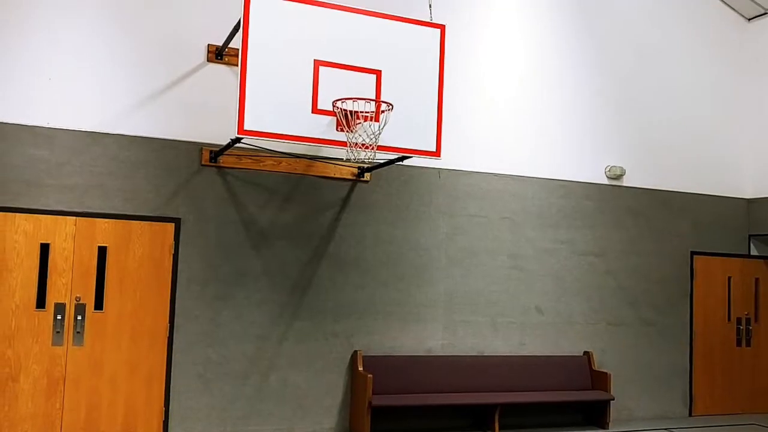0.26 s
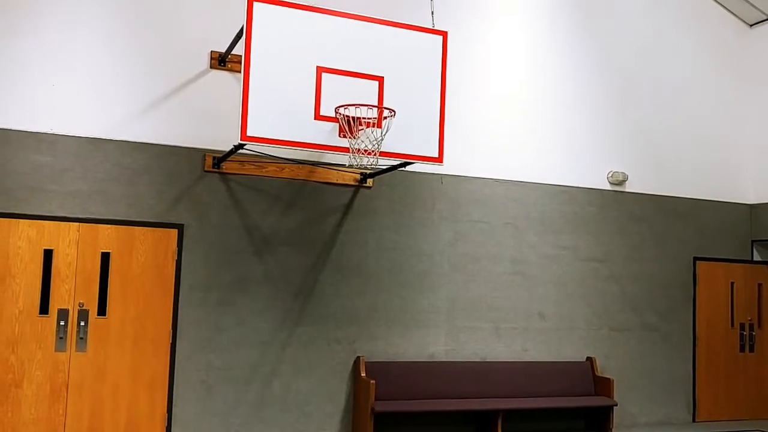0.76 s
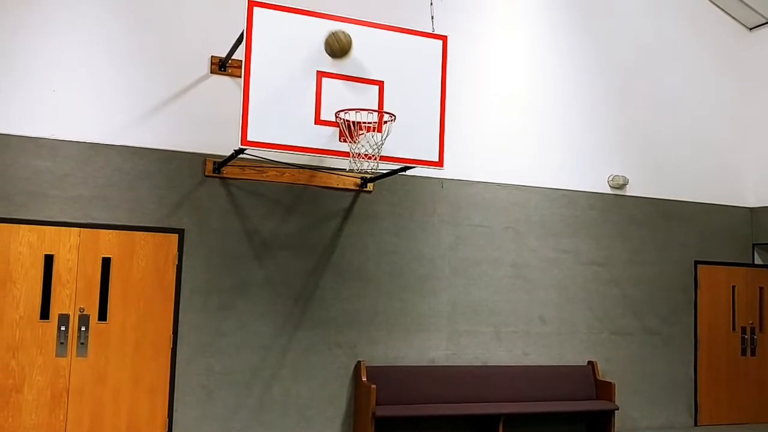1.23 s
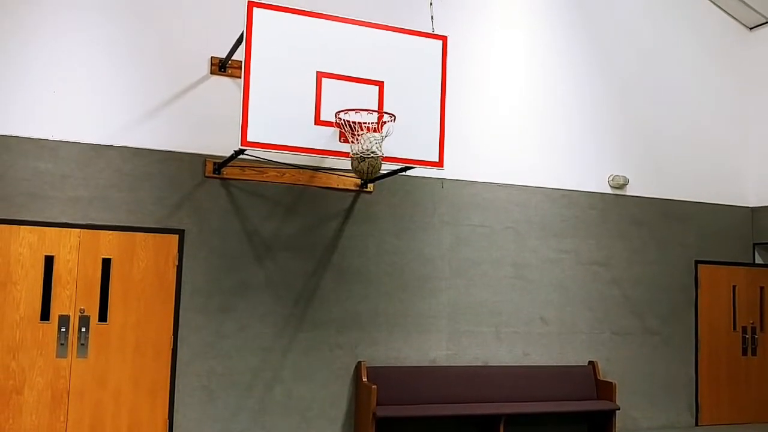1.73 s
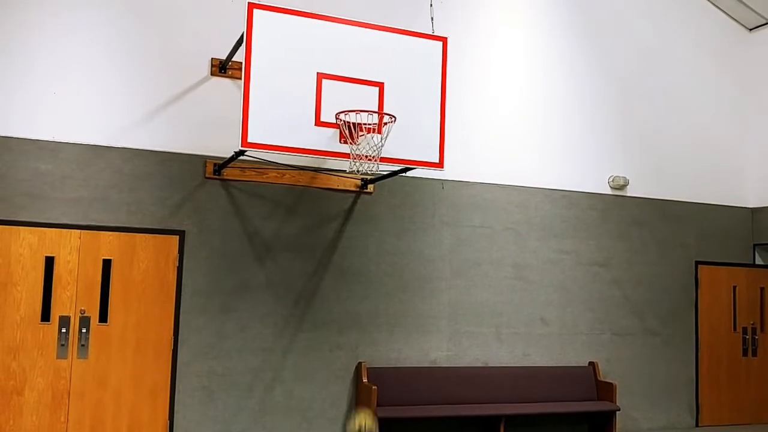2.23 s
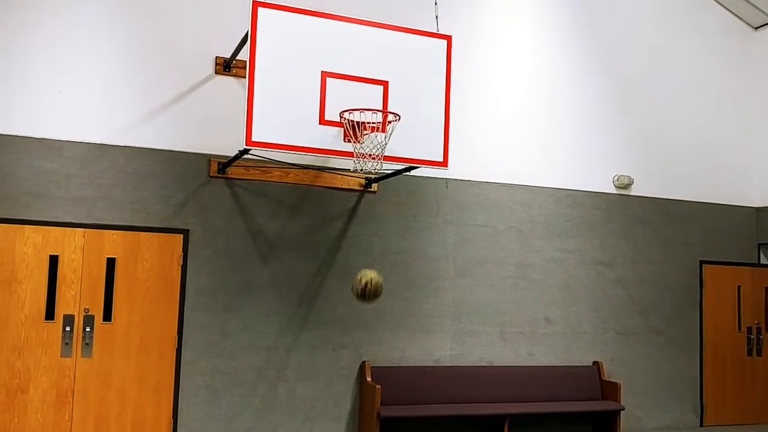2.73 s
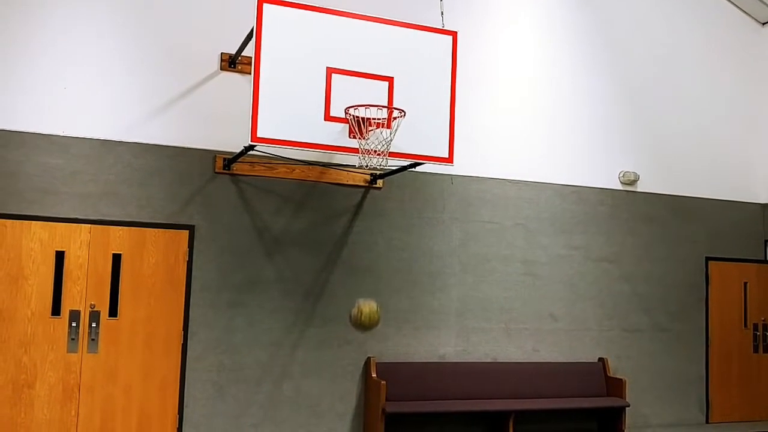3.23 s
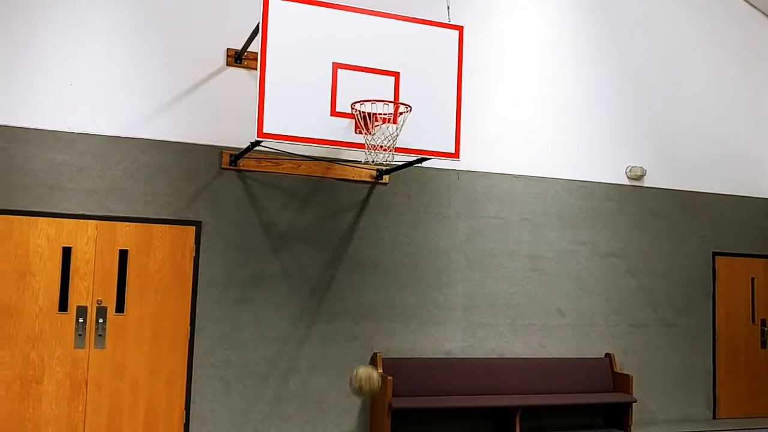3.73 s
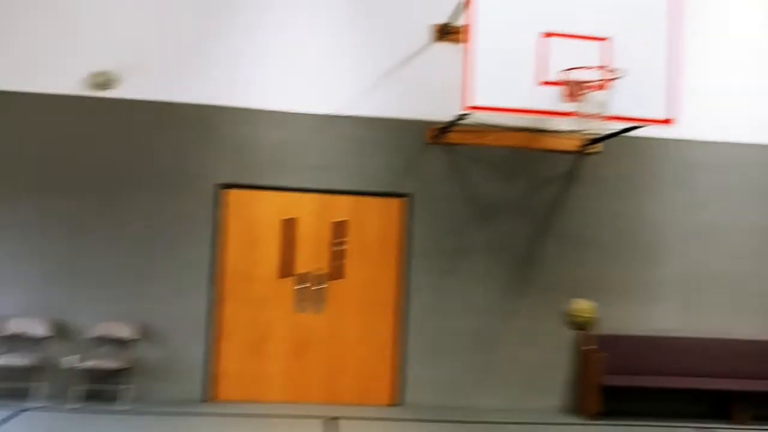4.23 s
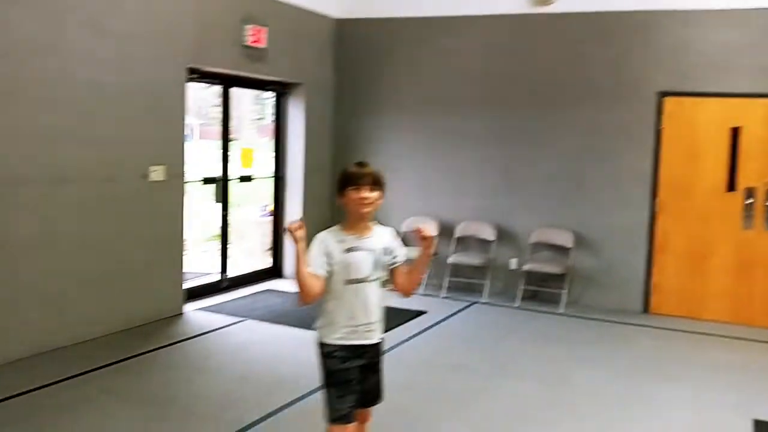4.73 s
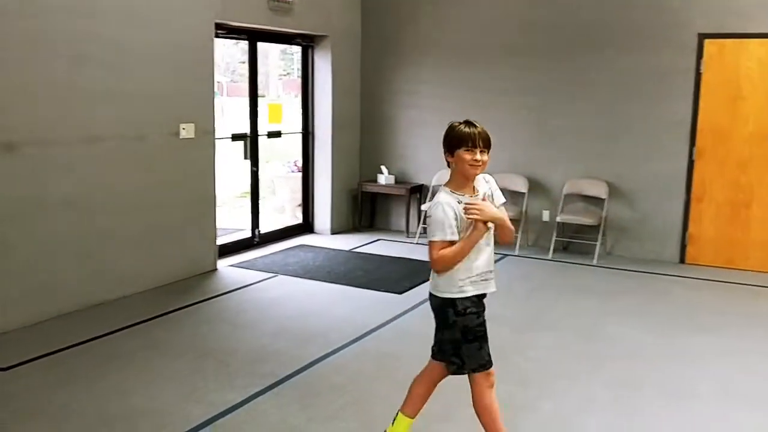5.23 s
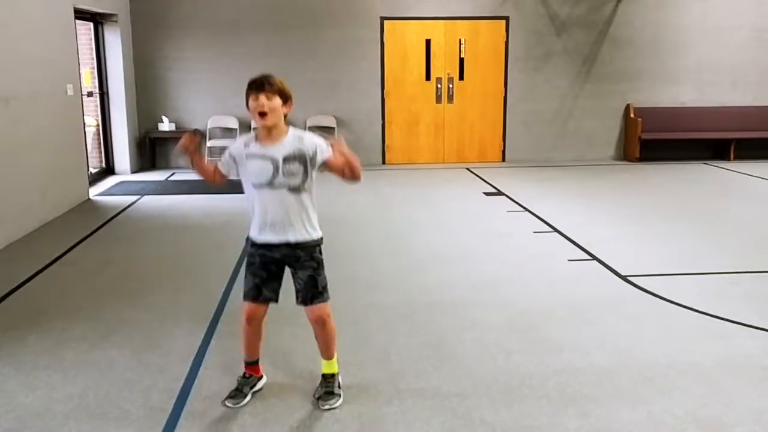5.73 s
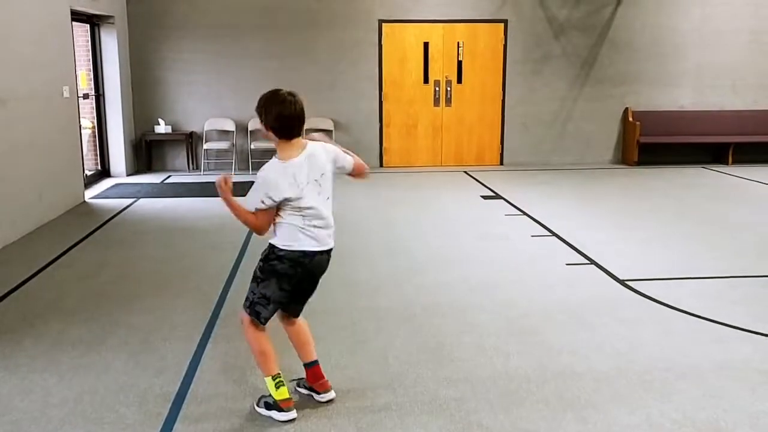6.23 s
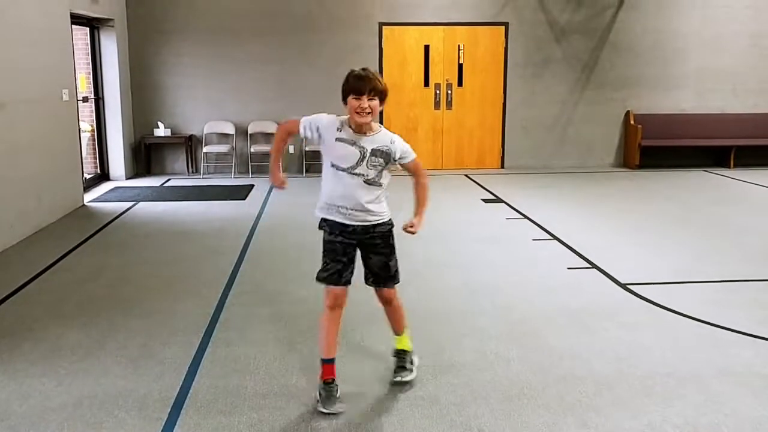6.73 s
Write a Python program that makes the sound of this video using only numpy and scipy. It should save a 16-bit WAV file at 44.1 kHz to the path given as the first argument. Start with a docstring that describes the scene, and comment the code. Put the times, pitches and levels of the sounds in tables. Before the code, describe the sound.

A basketball rattles the hoop, swishes through the net and bounces four times in an echoing gym; two claps, then shuffling feet.

```python
"""In the still air of an echoing gym an earlier echo dies away, and clothes brush faintly now and then.
A basketball rattles on the hoop: knocks, ringing steel and a booming board. The net quivers, then
swishes as its cords snag on the ball. The ball bounces four times: rubber smack, ringing air, thump.
Two thin ticks fall among the bounces. Hands near the microphone clap twice with bursts of noise.
The level dips briefly; feet shuffle with a growing rumble and hiss, and a sole scuffs with a rasp."""
import sys
import numpy as np
from scipy import signal
from scipy.fft import rfft, irfft, next_fast_len
from scipy.io import wavfile
from scipy.ndimage import uniform_filter1d

SR = 44100
rng = np.random.default_rng(int(sys.argv[2]) if len(sys.argv) > 2 else 0)


def to_wav(s):
    """Save 16-bit WAV."""
    ch = np.atleast_2d(s).T  # columns
    pcm = np.round(np.clip(ch, -1, 1) * 32767)  # PCM
    wavfile.write(sys.argv[1], SR, pcm.astype(np.int16))


N = 307375  # length of the scene in samples


def gain_of(db):
    """Turns decibels into a factor for the sound pressure."""
    return 10 ** (np.asarray(db) / 20)


def evened(x):
    """Scales a sound to an average strength (rms) of 1."""
    return x / np.sqrt(np.mean(x ** 2) + 1e-20)


def read(points, hz):
    """Reads a table between its points, with pitch spaced as the ear hears it (log frequency)."""
    table_hz, value = np.transpose(points)
    return np.interp(np.log(hz + 1), np.log(table_hz + 1), value)


def add(mix, start_s, sound):
    """Mixes a sound in at a time, cutting off what does not fit."""
    part = mix[..., max(round(start_s * SR), 0):][..., :sound.shape[-1]]
    part += sound[..., :part.shape[-1]]


def colour(x, spectrum):
    """Filters a steady sound by a table of levels over pitch, then evens it to rms 1."""
    n = x.shape[-1]
    size = next_fast_len(n)
    gain = gain_of(read(spectrum, np.fft.rfftfreq(size, 1 / SR)))
    return evened(irfft(rfft(x, size) * gain, size)[..., :n])


def click(spectrum, tilt_db=0, size=4096):
    """A sudden click of energy 1 with this spectrum, tilted about 1 kHz by some dB per octave."""
    hz = abs(np.fft.fftfreq(size, 1 / SR))
    octaves = np.log2(np.maximum(hz, 250) / 1000)  # the tilt stays level below 250 Hz
    log_gain = np.log(gain_of(read(spectrum, hz) + tilt_db * octaves))
    # minimum phase: the energy comes as early as it can, and nothing before the start
    pulse = np.fft.ifft(np.exp(np.conj(signal.hilbert(log_gain)))).real[:size // 2]
    return pulse / np.linalg.norm(pulse)


def ring(modes):
    """A struck body sounds as a sum of sine tones, each falling by 60 dB in its own time t60."""
    t = np.arange(SR) / SR
    return sum(gain_of(db - 60 * t / t60) * np.sin(2 * np.pi * hz * t) for hz, db, t60 in modes)


def resonate(x, hz, width_hz):
    """A resonance of gain 1 that can follow a moving pitch."""
    turn = np.exp(2j * np.pi * np.cumsum(hz * np.ones(len(x))) / SR)
    r = np.exp(-np.pi * width_hz / SR)
    # shift the pitch down to zero, smooth there, and shift back up
    return 2 * (turn * signal.lfilter([1 - r], [1, -r], x / turn)).real


def burst(t60, rise_s=0.0011):
    """A short puff of noise of energy 1 that rises quickly and dies away."""
    t = np.arange(SR // 20) / SR
    puff = rng.standard_normal(len(t)) * gain_of(-60 * t / t60) * (1 - np.exp(-t / rise_s))
    return puff / np.linalg.norm(puff)


def held(start_s, attack_s, length_s, release_s):
    """A gain that rises to 1, holds, and falls after length_s."""
    t = np.arange(N) / SR - start_s
    return np.clip(t / attack_s, 0, 1) * np.clip(1 - (t - length_s) / release_s, 0, 1)


def bell(peak_s, half_width_s):
    """A smooth swell to 1 and back, shaped like a bell curve."""
    return np.exp(-.5 * ((np.arange(N) / SR - peak_s) / half_width_s) ** 2)


# how alike the two ears hear sound from all sides: pitch_hz, likeness (1 = the same)
EAR_LIKENESS = [(100, 0.96), (200, 0.93), (350, .82), (700, 0.08), (1300, 0.0077), (8000, 0.01)]


def diffuse(n):
    """Noise arriving from all sides: the two ears agree only in the bass."""
    size = next_fast_len(n)
    a, b = rfft(rng.standard_normal((2, size)))
    same = np.clip(read(EAR_LIKENESS, np.fft.rfftfreq(size, 1 / SR)), -1, 1)
    right = same * a + np.sqrt(1 - same ** 2) * b
    return irfft(np.array([a, right]), size)[:, :n]


# slaps off the nearest walls: delay_s, gain (before echo_db), left_ear_late_ms
WALL_ECHOES = [(.0105, .48, 0.15), (0.0172, 0.4, .3), (0.0234, 0.11, -.3), (0.0361, 0.26, .2),
               (.052, .2, -.4), (.069, 0.3, .3)]


def near(sound, late_ms=0, pan_db=0, echo_db=0):
    """The direct sound and its slaps off the nearest walls; pan_db is left over right."""
    paths = np.zeros((2, SR // 10))
    add(paths[0], late_ms / 1000, gain_of([pan_db / 2]))
    add(paths[1], 0, gain_of([-pan_db / 2]))
    for delay_s, gain, wall_ms in WALL_ECHOES:
        add(paths[0], delay_s + wall_ms / 1000, gain * gain_of([echo_db]))
        add(paths[1], delay_s, gain * gain_of([echo_db]))
    return signal.fftconvolve(sound[None], paths, axes=1)[:, :N]


# how long the diffuse echo takes to fall by 60 dB: pitch_hz, t60_s
HALL_T60 = [(60, .75), (150, 0.75), (350, 0.93), (700, 0.82), (2000, 0.68), (4500, 0.66), (8000, 0.49),
            (12000, 0.19)]
HALL_DB = -33  # strength of the diffuse echo, before room_db


def hall(sound, room_db, build_s=0.004, scatter=0, scatter_s=.03):
    """The diffuse echo builds up, then dies, treble first; things near the source can scatter more early on."""
    hz, t, z = signal.stft(diffuse(SR), SR, nperseg=512)
    fading = z * gain_of(-60 * t / read(HALL_T60, hz)[:, None])
    tail = signal.istft(fading, SR, nperseg=512)[1][:, :SR]
    t = np.arange(SR) / SR
    build_up = 1 - np.exp(-(t / build_s) ** 2)
    early = 1 + scatter * np.exp(-(t / scatter_s) ** 2)
    tail *= gain_of(room_db + HALL_DB) * build_up * early
    return signal.fftconvolve(sound[None], tail, axes=1)[:, :N]


def gym(sound, room_db, late_ms=0, pan_db=0, echo_db=0):
    """A sound as it arrives by all paths: direct, off the walls and as diffuse echo."""
    out = hall(sound, room_db)
    add(out, 0, near(sound, late_ms, pan_db, echo_db))
    return out


# still air of the hall: pitch_hz, relative_level_db
AIR = [(15, -30), (25, 2.5), (54, -7.5), (86, -7.5), (104, -16.5), (238, -20), (288, -6), (431, -27),
       (479, -18), (964, -24), (1940, -23), (2210, -30), (4220, -32.5), (5820, -34), (15300, -41.5)]
AIR_DB = -63.5
# knock on the hoop, also the colour of the earlier echo: pitch_hz, relative_level_db
KNOCK = [(50, -13.5), (160, 5), (280, 3), (400, -1.5), (650, 1), (1000, -2.5), (1600, 0), (2200, -6),
         (3000, -18), (4500, -12), (7000, -16), (8700, -17), (10500, -44.5), (15000, -46)]
# faint brushing of clothes: start_s, length_s, level_db
RUSTLES = [(-.02, 0.17, -64), (0.211, 0.088, -56.5), (2.156, 0.16, -58.5), (4.103, 0.098, -69.5),
           (6.192, .15, -58), (6.82, 0.11, -46.5)]
# colour of brushing cloth, also of the grit under the sole: pitch_hz, relative_level_db
CLOTH = [(500, -32), (2000, -4), (4000, 3.5), (6500, -8.5), (9000, 5.5), (10500, -53), (15000, -11.5)]
# thin dry ticks: start_s, level_db
TICKS = [(3.462, -33.5), (4.4306, -25.5)]


def background(dying_db=-51, fall_db_per_s=45):
    """Coloured noise for still air, an earlier echo dying away and brushing clothes; a tick is one sample."""
    t = np.arange(N) / SR
    out = gain_of(AIR_DB) * colour(diffuse(N), AIR)
    out += gain_of(dying_db - fall_db_per_s * t) * colour(diffuse(N), KNOCK)
    for start_s, length_s, level_db in RUSTLES:
        n = int(length_s * SR)
        add(out, start_s, gain_of(level_db) * colour(diffuse(n), CLOTH) * np.hanning(n))
    for start_s, level_db in TICKS:
        add(out, start_s, gain_of([level_db]))
    return out


# ball on the hoop: start_s, knock_db, treble_tilt_db_per_octave, board_boom_db, steel_ring_db
HOOP_HITS = [(0.8998, -8, -2, -22, -27), (0.9054, 3.5, -2.5, -10.5, -18), (0.9309, -11, 3, -17.5, -13),
             (1.0979, 1, -0.5, -14, -20), (1.114, -1, -6, -9, -30), (1.128, 0, -6, 3, -27),
             (1.1667, 2, -1, -21, -17), (1.178, -1, -1, -22, -15), (1.188, 0, 0, -20, -17)]
# backboard and its bracket: pitch_hz, relative_level_db, t60_s
BOARD = [(48.2, -22.5, 1.9), (56, -15.5, 0.14), (71, -19.5, .18), (97.8, -24, 0.88), (123.4, -21, 0.26),
         (139, -28, .4), (184.7, -45, 1.9), (267, -37, .9), (538, -43, .7), (803, -46, 0.7)]
# steel of the rim, which the net also shakes: pitch_hz, relative_level_db, t60_s
STEEL = [(1940, -49, .22), (4180, -47.5, 0.4), (4500, -46.5, .25), (4810, -46.5, 0.2), (4888, -49, 0.34),
         (5160, -57.5, .25), (5940, -45.5, 0.15), (6550, -46, .25), (8450, -40, .22), (8807, -42, 0.14)]


def hoop(room_db=4, boom_room_db=-3, chatter_t60=0.029, boom_late_s=.0022):
    """Each knock makes the mounting chatter, rings the steel rim and sets the heavy board booming."""
    out, boom = np.zeros((2, N)), np.zeros(3 * SR)
    steel, board = ring(STEEL), ring(BOARD)
    for start_s, knock_db, tilt_db, boom_db, steel_db in HOOP_HITS:
        knock = gain_of(steel_db) * steel
        add(knock, 0, gain_of(knock_db) * click(KNOCK, tilt_db))
        chatter = signal.fftconvolve(knock, burst(chatter_t60))
        add(out, start_s, near(chatter, echo_db=-1))
        add(out, start_s, hall(knock, room_db))
        add(boom, start_s + boom_late_s, gain_of(boom_db) * board)
    add(out, 0, gym(boom, boom_room_db))
    return out


# cords on the ball: pitch_hz, relative_level_db
NET = [(30, -17.5), (50, 3.5), (90, -1.5), (145, -2.5), (240, -8), (450, -10), (700, -7.5), (1060, -5),
       (1470, -13), (1850, -5), (3200, -10), (4700, -5), (5900, -5.5), (7000, -10.5), (8900, -5.5),
       (10600, -27), (12000, -19), (15300, -22)]
# the net quivers from early in the rattle: start, length, dying away (s), level (dB)
QUIVER_AT_S, QUIVER_S, QUIVER_RELEASE_S, QUIVER_DB = .92, .5, .2, -54
# the pull on the cords swells and eases: moment of the tightest squeeze, half width (s), level (dB)
SQUEEZE_AT_S, SQUEEZE_S, SQUEEZE_DB = 1.2434, 0.036, -14


def net(snags_per_s=5000, spread_db=2.5, steel_db=-12, room_db=4, clatter_db=2, layers=4):
    """Cords snag and slip in clumps on the pebbled ball, shaking the rim."""
    out, steel, n = np.zeros((2, N)), ring(STEEL), 2 * SR
    snap = gain_of(steel_db) * steel / np.linalg.norm(steel)
    add(snap, 0, click(NET))
    quiver = gain_of(QUIVER_DB) * held(QUIVER_AT_S, .01, QUIVER_S, QUIVER_RELEASE_S)
    squeeze = gain_of(SQUEEZE_DB) * bell(SQUEEZE_AT_S, SQUEEZE_S)
    pull = (quiver + squeeze)[:n] / np.sqrt(layers)  # keeps the summed power the same
    # several layers of snags, each with its own diffuse echo, make an even swish
    for _ in range(layers):
        snags = (rng.random(n) < snags_per_s / layers / SR) * rng.choice([-1, 1], n)
        clumps = evened(uniform_filter1d(rng.standard_normal(n), size=250))
        strength_db = spread_db * np.minimum(rng.exponential(1, n), 3) + clatter_db * clumps
        snags = snags * gain_of(strength_db)
        cords = signal.fftconvolve(evened(snags) * pull, snap)[:n]
        add(out, 0, gym(cords, room_db, late_ms=.12, pan_db=-4.5, echo_db=-0.5))
    return out


# ball on the floor: start_s, thump_db, slap_db, slap_tilt_db_per_octave, direct_slap_db, left_ear_late_ms
BOUNCES = [(2.0578, -2.5, 2, -3, 0.5, 0.02), (3.2711, -7.5, -1, -3.5, -3.5, 0.02),
           (4.2942, -9.5, -5, 1.8, 1, 0.37), (5.1731, -13, -8, 3, 2.5, 0.33)]
# ball squashing and springing back: pitch_hz, relative_level_db, t60_s
THUMP = [(120, -8, 0.051), (147, -14, 0.2), (177, -3.5, 0.025), (225, -17.5, .08), (303, -25, 0.13),
         (406, -29, 0.044)]
# air ringing inside the ball: pitch_hz, relative_level_db, t60_s
CAVITY = [(903, -32, 0.08), (1140, -36, 0.11), (1600, -30, 0.017), (1870, -29, 0.0078), (2750, -66, 0.8)]
# smack of the rubber: pitch_hz, relative_level_db
SLAP = [(100, -12), (330, -11), (450, -15.5), (620, -7.5), (900, -1.5), (1300, 0), (1800, 1), (2250, -9.5),
        (2800, -19.5), (3600, -29.5), (4600, -25.5), (7000, -62), (9500, -64), (15000, -66)]


def bounces(rubber_db=5.5, room_db=1.5, thump_room_db=1.0, squash_s=.0015,
            floor_hz=72, floor_db=-3.0, floor_t60=0.12, floor_late_s=.008):
    """The rubber smacks and rings the air inside; the ball squashes with a thump, and the floor booms after it."""
    out = np.zeros((2, N))
    floor = ring([(floor_hz, floor_db, floor_t60)])[:SR // 2]
    thump, cavity = ring(THUMP)[:SR // 2], ring(CAVITY)
    for start_s, thump_db, slap_db, tilt_db, direct_db, late_ms in BOUNCES:
        smack = cavity.copy()
        add(smack, 0, gain_of(rubber_db) * click(SLAP, tilt_db))
        smack *= -gain_of(slap_db)  # the pressure first drops as the ball stops
        add(out, start_s, gain_of(direct_db) * near(smack, late_ms, echo_db=-2))
        # bench and wall are close, so they scatter extra sound early on
        add(out, start_s, hall(smack, room_db, build_s=0.0095, scatter=1.8, scatter_s=0.022))
        squash = gym(gain_of(thump_db) * thump, thump_room_db, late_ms, echo_db=-2.0)
        add(out, start_s + squash_s, squash)
        add(out, start_s + floor_late_s, gain_of(thump_db) * floor)
    return out


# cracks of the two claps (the first lands unevenly and slaps back off a wall, so it has three rows):
# start_s, level_db, cupped_hand_hz, cupped_hand_db, t60_s, left_over_right_db, room_db
CLAPS = [(4.6725, 6.5, 2300, 9, 0.0047, -1.5, 2), (4.676, 8, 2000, 11.5, 0.0096, -11.5, 3.5),
         (4.6874, 1.5, 2100, 13, 0.0075, 16.5, -1), (4.925, 9, 4370, -4, 0.011, -8, -0.5)]
# crack of skin on skin: pitch_hz, relative_level_db
PALM = [(80, -5.5), (250, -11), (550, -8), (1000, -3.5), (2000, 4.5), (3200, -1.5), (4500, 2.5),
        (7000, 1.5), (8500, 5.5), (9800, -4.5), (10700, -23.5), (12000, -14), (15000, -12)]


def claps(cup_width_hz=850, flesh_hz=600, flesh_db=-2):
    """Air bursts from between the palms, coloured by their hollow; the flesh adds a pat that carries only nearby."""
    out = np.zeros((2, N))
    for start_s, level_db, cup_hz, cup_db, t60, pan_db, room_db in CLAPS:
        crack = click(PALM)
        crack = crack + gain_of(cup_db) * resonate(crack, cup_hz, cup_width_hz)
        crack *= gain_of(level_db) / np.linalg.norm(crack)
        pat = resonate(resonate(crack, flesh_hz, 720), flesh_hz, 707)
        close = signal.fftconvolve(crack + gain_of(flesh_db) * pat, burst(t60))
        add(out, start_s, near(close, late_ms=.25, pan_db=pan_db, echo_db=-6.5))
        add(out, start_s, hall(crack, room_db, build_s=.016))
    return out


# low part of the shuffling: pitch_hz, relative_level_db
RUMBLE = [(21, -51), (35, -21), (60, -11), (129, 2.5), (172, -7.5), (210, -2.5), (265, -11.5), (418, -14),
          (463, -8.5), (500, -18.5), (650, -43), (1100, -120)]
# high part of the shuffling: pitch_hz, relative_level_db
HISS = [(250, 0.5), (480, 7), (900, 6), (1400, 2.5), (2000, 4.5), (2800, -7.5), (4500, -4), (7000, -14),
        (9200, -14), (10500, -31), (15000, -22.5)]
# the noise of moving about grows steadily, then holds: start, full from (s)
STIR_AT_S, STIR_FULL_S = 5.76, 6.583
# its two layers: full level (dB), growth (dB per s)
RUMBLE_DB, RUMBLE_GROWTH_DB_PER_S = -39.5, 18
HISS_DB, HISS_GROWTH_DB_PER_S = -43.5, 16
# a soft footfall lifts both: moment, half width (s), lift (dB)
STEP_AT_S, STEP_S, STEP_DB = 6.016, 0.022, 6.5


def feet():
    """Shuffling makes a low rumble and a hiss that grow steadily, with one soft footfall on the way."""
    t = np.arange(N) / SR
    to_go_s = np.maximum(STIR_FULL_S - t, 0)
    rumble = colour(diffuse(N), RUMBLE) * gain_of(RUMBLE_DB - RUMBLE_GROWTH_DB_PER_S * to_go_s)
    hiss = colour(diffuse(N), HISS) * gain_of(HISS_DB - HISS_GROWTH_DB_PER_S * to_go_s)
    footfall = gain_of(STEP_DB * bell(STEP_AT_S, STEP_S))
    return (rumble + hiss) * (t > STIR_AT_S) * footfall


# one slide of a sole: start, grip, length, lift-off (s), level (dB), easing (dB per s)
SCUFF_AT_S, SCUFF_ATTACK_S, SCUFF_S, SCUFF_RELEASE_S = 6.45, 0.087, 0.35, 0.058
SCUFF_DB, SCUFF_EASE_DB_PER_S = -35.5, 21
# its rasp drops as the sole slows: fast, slow (Hz), moment of braking, time that it takes (s)
FAST_HZ, SLOW_HZ, BRAKE_AT_S, BRAKE_S = 4790, 3400, 6.63, 0.036


def scuff(grit_db=-10, room_db=3, judder_db=4, width_hz=1400):
    """A sliding sole judders and rasps lower as it slows: rough noise through a falling resonance."""
    t = np.arange(N) / SR
    hz = SLOW_HZ + (FAST_HZ - SLOW_HZ) * (1 - np.tanh((t - BRAKE_AT_S) / BRAKE_S)) / 2
    press = held(SCUFF_AT_S, SCUFF_ATTACK_S, SCUFF_S, SCUFF_RELEASE_S)
    press *= gain_of(SCUFF_DB - SCUFF_EASE_DB_PER_S * (t - SCUFF_AT_S))
    judder = evened(uniform_filter1d(rng.standard_normal(N), size=300))
    grit = rng.standard_normal(N) * gain_of(judder_db * judder)
    rasp = evened(resonate(resonate(grit, hz, width_hz), hz, width_hz))
    rasp = rasp + gain_of(grit_db) * colour(grit, CLOTH)
    return gym(rasp * press, room_db, late_ms=.3, echo_db=-3.5)


def scene():
    """Everything in the hall, summed."""
    return background() + hoop() + net() + bounces() + claps() + feet() + scuff()


# the level dips briefly: start_s, end_s, level_db
DIPS = [(5.64, 5.777, -37.5), (6.036, 6.062, -14.5), (6.078, 6.098, -20.5)]
EDGE_HZ = 15600  # the treble ends here


def record(dry, low_cut_hz=41):
    """The microphone loses the deepest bass, the level dips briefly, peaks clip, and the treble is cut off."""
    t = np.arange(N) / SR
    heard = signal.sosfilt(signal.butter(5, low_cut_hz, "high", fs=SR, output="sos"), dry)
    dip_db = sum(db * ((t > start_s) & (t < end_s)) for start_s, end_s, db in DIPS)
    smooth_dip_db = uniform_filter1d(dip_db, size=200)
    clipped = np.clip(heard * gain_of(smooth_dip_db), -1, 1)
    treble_cut = signal.firwin(511, EDGE_HZ, window=("kaiser", 9), fs=SR)
    return signal.oaconvolve(clipped, treble_cut[None], "same")


dry = scene()
out = record(dry)
to_wav(out)
```